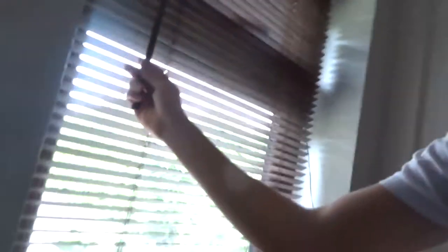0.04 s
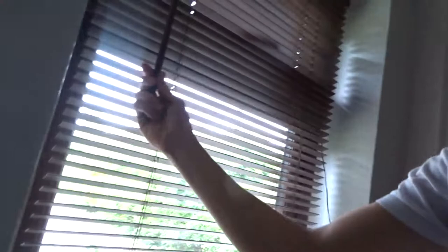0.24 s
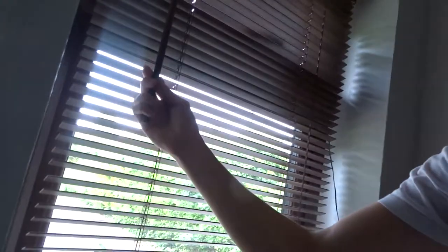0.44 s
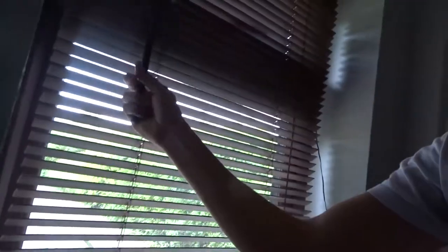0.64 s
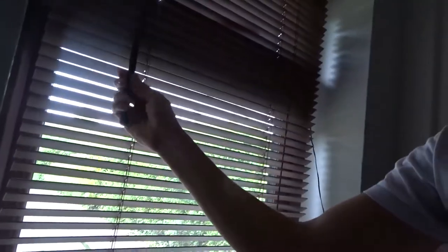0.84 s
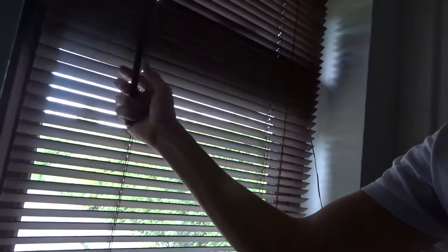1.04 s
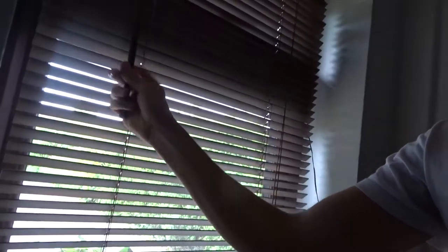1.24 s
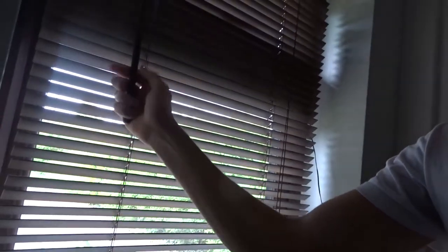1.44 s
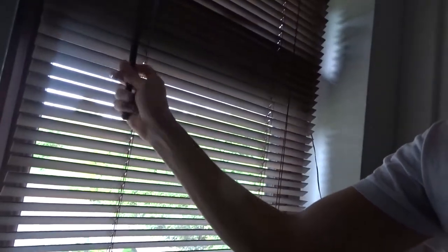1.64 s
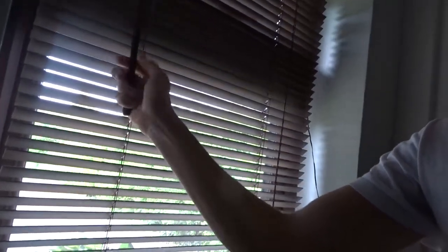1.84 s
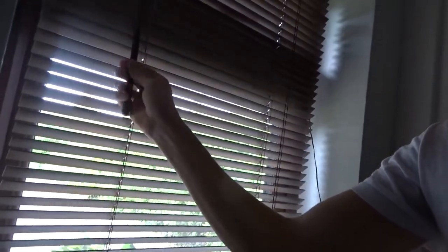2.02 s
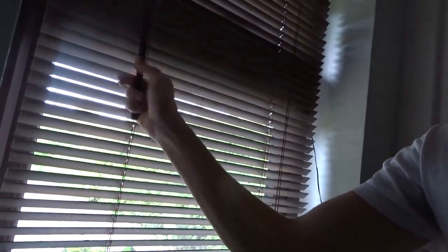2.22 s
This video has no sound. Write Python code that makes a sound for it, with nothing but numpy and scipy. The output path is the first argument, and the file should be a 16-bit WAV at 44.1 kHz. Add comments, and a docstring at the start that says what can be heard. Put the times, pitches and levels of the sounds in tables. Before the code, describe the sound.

Wooden venetian blind slats clatter in short dry bursts as a hand twists the tilt wand

```python
"""Cascades of slat knocks from a wooden venetian blind, as a hand twists its tilt wand in a quiet living room.
Each jerk of the wand tips the slats: sparse impulses, voiced by a falling resonance, ring slats and head rail.
Ticks of the gear and the wand hook are resonant clicks, each with the ring of the blind after it.
At first the blind rustles (coloured grains and hiss) and scrapes (grains in a resonance sliding down).
Steady noise is the hush of the room; two microphone ports close by and a short room tail make it stereo."""
import sys
import numpy as np
from scipy import signal
from scipy.fft import rfft, irfft, next_fast_len
from scipy.io import wavfile
from scipy.ndimage import uniform_filter1d

SR = 44100
rng = np.random.default_rng(int(sys.argv[2]) if len(sys.argv) > 2 else 0)


def file_out(sig):
    """Save sig as 16-bit WAV at sys.argv[1]."""
    # one column per channel
    cols = np.atleast_2d(sig).T
    # limit, then scale
    lim = np.clip(cols, -1, 1)
    pcm = np.round(lim * 32767).astype(np.int16)
    wavfile.write(sys.argv[1], SR, pcm)


def gain_from_db(level_db):
    """Turn a decibel level (scalar or array-like) into a linear amplitude factor."""
    decades = np.asarray(level_db, float) / 20
    return 10 ** decades


N = 100371  # length in samples
TREBLE_HZ = 4540  # where the treble of rustle and cascades is split off


def evened(x):
    """Normalisation: scales a signal to an rms of one."""
    return x / np.sqrt(np.mean(x ** 2) + 1e-20)


def read(points, hz):
    """Interpolation of a (Hz, value) table on a logarithmic frequency axis."""
    f, value = np.transpose(points)
    return np.interp(np.log(hz + 1), np.log(f + 1), value)


def add(mix, s, sound):
    """Superposition: mixes a sound in at s seconds."""
    part = mix[..., max(round(s * SR), 0):][..., :sound.shape[-1]]
    part += sound[..., :part.shape[-1]]


def coloured(x, points):
    """Minimum-phase filtering: a (Hz, dB) gain curve fixes the phase of the causal response."""
    hz = abs(np.fft.fftfreq(4096, 1 / SR))
    log_gain = np.log(gain_from_db(read(points, hz)) + 1e-6)
    response = np.exp(np.conj(signal.hilbert(log_gain)))
    taps = np.fft.ifft(response).real[:2048]
    taps = taps.reshape((1,) * (x.ndim - 1) + (-1,))
    return signal.oaconvolve(x, taps, axes=-1)[..., :x.shape[-1]]


def resonate(x, hz, width):
    """Resonance of one damped oscillator, a pair of poles; its Q is at least 0.6."""
    return signal.lfilter(*signal.iirpeak(hz, max(hz / width, .6), SR), x)


def glide(x, hz, width):
    """Resonance with a moving centre: heterodyning by the curve hz around a one-pole low-pass."""
    turn = np.exp(2j * np.pi * np.cumsum(hz) / SR)
    r = np.exp(-np.pi * width / SR)
    return 2 * (turn * signal.lfilter([1 - r], [1, -r], x / turn)).real


def decaying(count, t60s, size):
    """Frequency-dependent damping: noise tails of energy one whose bands die at their own speed."""
    hz, t, z = signal.stft(rng.standard_normal((count, size)), SR, nperseg=128)
    decay = gain_from_db(-60 * t / read(t60s, hz)[:, None])
    tail = signal.istft(z * decay, SR, nperseg=128)[1][:, :size]
    return tail / np.linalg.norm(tail, axis=1, keepdims=True)


def knocks(size, per_s):
    """Random impact process: sparse impulses of random sign, a few of them large."""
    chance, sign, big = rng.random(size), rng.standard_normal(size), rng.exponential(1, size)
    size_db = 2.5 * np.minimum(big, 3)
    return (chance < per_s / SR) * np.sign(sign) * gain_from_db(size_db)


# Course of the rustle. Each row: time in seconds, level of the body in dB, level of the treble in dB.
RUSTLE_COURSE = [(0, -43.5, -55.5), (.12, -46, -56), (.19, -48, -51.5), (0.27, -58, -60), (0.329, -67, -68)]
# Spectrum of the rustling knocks. Each row: frequency in Hz, gain in dB.
RUSTLE_SPECTRUM = [(100, -48), (380, -10.5), (560, -2.5), (3500, -0.5), (6500, -16)]
RUSTLE_PER_S = 4000  # knocks per second


def rustle():
    """Granular excitation: faint uneven knocks of the slats and a hiss of cords while the blind settles."""
    s, body_db, treble_db = np.transpose(RUSTLE_COURSE)
    t = np.arange(N) / SR
    grains = evened(coloured(knocks(N, RUSTLE_PER_S), RUSTLE_SPECTRUM))
    high_pass = signal.butter(4, TREBLE_HZ, "high", fs=SR, output="sos")
    hiss = evened(signal.sosfilt(high_pass, rng.standard_normal(N)))
    body = gain_from_db(np.interp(t, s, body_db)) * grains
    treble = gain_from_db(np.interp(t, s, treble_db)) * hiss
    return (t < s[-1]) * (body + treble)


SCRAPE_HZ, SCRAPE_WIDTH_HZ = (630, 505), 47  # resonance from first to last, and its width
SCRAPE_DB, SCRAPE_S, SCRAPE_PER_S = -52.5, 0.13, 1300  # level before the fade, length, grains per second


def scrape():
    """Resonantly filtered friction: low grains in one resonance that slides down as they fade."""
    u = np.linspace(0, 1, round(SCRAPE_S * SR))
    grains = knocks(len(u), SCRAPE_PER_S)
    low = glide(grains, np.interp(u, (0, 1), SCRAPE_HZ), SCRAPE_WIDTH_HZ)
    return gain_from_db(SCRAPE_DB) * np.sqrt(1 - u) * evened(low)


# Spectrum of the hush. Each row: frequency in Hz, gain in dB.
AIR_SPECTRUM = [(30, -71), (250, -17), (900, 3.5), (1700, 0), (6000, -6), (11500, -16)]
AIR_DB, AIR_SAME = -57.5, 0.44  # rms level, left-right correlation


def air():
    """Stationary, partly correlated noise: the steady hush of the room and the microphones."""
    a, b = rng.standard_normal((2, N))
    right = AIR_SAME * a + np.sqrt(1 - AIR_SAME ** 2) * b
    return gain_from_db(AIR_DB) * evened(coloured(np.array([a, right]), AIR_SPECTRUM))


# Spectrum of a struck slat. Each row: frequency in Hz, gain in dB.
SLAT_SPECTRUM = [(60, -73), (320, -26.5), (520, -17.5), (740, -6), (1300, -4.5), (4500, 1.5), (7500, -13),
                 (11500, -21.5)]
# Damping of the dense ring. Each row: frequency in Hz, time to fall by 60 dB in seconds.
SLAT_T60 = [(300, 0.32), (2000, 0.051), (9000, 0.036)]
# Modes shared by all slats and the rail. Each entry: frequency in Hz.
SHARED_MODES = [714.7, 781, 930, 1120.5, 1195.5, 1343, 1845, 1935, 2168, 2532]
MODES_DB, MODES_T60_S = -8, .075  # energy relative to knock and ring, time to fall by 60 dB
KNOCK_DB = -5  # dry knock relative to the ring, before colouring
EARLY_DB, EARLY_S = 4.5, 0.0026  # the ring starts strong and drops quickly to its tail


def slats(count):
    """Modal superposition: a dry knock, a dense ring for each slat and the modes they all share."""
    ring = decaying(count, SLAT_T60, size=12000)
    t = np.arange(12000) / SR
    modes = np.zeros((count, len(t)))
    for hz in SHARED_MODES:
        strength = rng.uniform(-1, 1, (count, 1)) / np.sqrt(hz)
        modes += strength * gain_from_db(-60 * t / MODES_T60_S) * np.sin(2 * np.pi * hz * t)
    modes = signal.sosfilt(signal.butter(4, 600, "high", fs=SR, output="sos"), modes)
    ring *= 1 + gain_from_db(EARLY_DB) * np.exp(-t / EARLY_S)
    ring /= np.linalg.norm(ring, axis=1, keepdims=True)
    ring[:, 0] += gain_from_db(KNOCK_DB)
    ring = coloured(ring, SLAT_SPECTRUM)
    ring /= np.linalg.norm(ring, axis=1, keepdims=True)
    return ring + gain_from_db(MODES_DB) * modes / np.linalg.norm(modes, axis=1, keepdims=True)


# Single ticks of gear and hook. Each row: start in seconds, level of the bare click in dB (rms over 1 ms),
# pitch in Hz, width of the resonance in Hz.
TICKS = [(.058, -34.5, 4470, 7300), (0.2449, -39, 3620, 604), (.355, -47.5, 3500, 4100),
         (.6855, -27, 3260, 3030), (2.019, -35.5, 2940, 3000), (2.215, -49.5, 3420, 3000),
         (2.251, -49, 3600, 1500), (.648, -38, 4200, 1480), (0.744, -37, 3720, 1540),
         (1.194, -22, 3600, 1800), (1.385, -40.5, 4050, 1210)]


def tick(ring, level_db, hz, width):
    """Impulse response: one sharp click with the blind ringing after it in the same colour."""
    impulse = np.arange(len(ring)) == 0
    click = resonate(resonate(impulse, hz, width), hz, 2 * width)
    after = ring + resonate(ring, hz, width)
    both = click / np.linalg.norm(click) + 1.32 * after / np.linalg.norm(after)
    return gain_from_db(level_db) * np.sqrt(SR / 1000) * both


# Cascades of slat knocks. Each row: start in seconds, greatest short-time rms level in dB,
# build-up in seconds (at least 0.001), dying away to -60 dB in seconds (at least 0.01),
# first pitch in Hz, gain of the treble in dB.
CASCADES = [(0.196, -47, 0.0021, 0.2, 1330, 5), (0.439, -37.5, 0.001, 0.22, 4200, 9),
            (.485, -49.5, 0.04, -4, 2300, -8), (0.532, -28, 0.0062, 0.17, 2750, 3),
            (0.603, -39, 0.011, 0.4, 2700, 0), (0.679, -28, 0.00087, 0.17, 3430, -0.5),
            (.76, -41.5, 0.001, 0.26, 2840, -3), (0.814, -34, 0.0026, 0.18, 4830, -12),
            (0.827, -36, 0.021, 0.22, 2060, -11), (0.892, -22.5, 0.0071, 0.22, 3360, 6),
            (1.0263, -21.5, 0.0022, 0.09, 3430, -3.5), (1.057, -33.5, 0.0028, 0.3, 3600, 5.5),
            (1.165, -35.5, 0.004, 0.2, 3170, -6.5), (1.196, -32.5, 0.00083, 0.14, 2220, 2.5),
            (1.24, -31, 0.00075, 0.32, 3580, 9), (1.259, -24, 0.01404, 0.2, 4600, 5),
            (1.592, -23, 0.0049, 0.1037, 3720, 2.5), (1.673, -29.5, 0.00085, 0.1362, 3600, 1.5),
            (1.944, -45.5, 0.00087, 0.1, 2030, 4.5), (2.008, -39, 0.0012, 0.1, 3180, 7.5),
            (2.05, -42, 0.012, 0.78, 1860, -3.5), (2.077, -26, 0.0026, 0.13, 3600, -1.5),
            (2.244, -47.5, 0.0044, 0.2, 1470, -4)]
KNOCKS_PER_S, THIN_S, LAST_SHARE = 3500, .015, .3  # knocks thin out to a sparser rattle
TREBLE_HASTE, BODY_HASTE = 3.64, 0.99  # speed-up of build-up and decay
KNOCK_Q, SAG_OCTAVES, SAG_S = 1.186, 1.27, 0.023  # early knocks are harder, so higher
BROAD_DB = -3  # knocks below the treble that bypass the resonance


def cascade(body, level_db, rise, fall, hz, treble_db):
    """Source and filter: knocks build up and die away, bright ones first, each exciting one of the slats."""
    t = np.arange(8000) / SR
    rise, fall = max(rise, .001), max(fall, .01)
    since_rise = np.maximum(t - rise, 0)

    def shape(haste):
        """Linear build-up and exponential decay."""
        return np.minimum(t * haste / rise, 1) * gain_from_db(-60 * haste * since_rise / fall)

    share = np.minimum(LAST_SHARE + np.exp(-since_rise / THIN_S), 1)
    hits = knocks(len(t), KNOCKS_PER_S * share)
    slat = rng.integers(0, len(body), len(t))
    on_slat = hits * (slat == np.arange(len(body))[:, None])
    bright = signal.lfilter(*signal.butter(2, TREBLE_HZ, "high", fs=SR), on_slat * shape(TREBLE_HASTE))
    slow = on_slat * shape(BODY_HASTE)
    centre = hz * 2 ** (-SAG_OCTAVES * (1 - np.exp(-t / SAG_S)))
    voiced = glide(glide(slow, centre, hz / KNOCK_Q), centre, hz / KNOCK_Q)
    broad = signal.lfilter(*signal.butter(2, TREBLE_HZ, fs=SR), slow)
    drive = voiced + gain_from_db(BROAD_DB) * broad + gain_from_db(treble_db) * bright
    sound = signal.fftconvolve(drive, body, axes=1)
    loudest = np.sqrt(uniform_filter1d(sound.sum(0) ** 2, size=600).max())
    return gain_from_db(level_db) * sound / loudest


# Likeness of the ports. Each row: frequency in Hz, left-right likeness from 0 to 1.
PORT_LIKENESS = [(600, 0.9), (3000, 0.99), (7000, 0.23)]
# Balance of the ports. Each row: frequency in Hz, left minus right in dB.
PORT_BALANCE = [(300, -1), (11000, -5)]
LEFT_LEAD_S = .000022


def ports(x):
    """Interaural-like differences: the left port is earlier and quieter, with a partly different mix of paths."""
    size = next_fast_len(N + 2000)
    hz = np.fft.rfftfreq(size, 1 / SR)
    paths = decaying(1, [(100, .07), (10000, .04)], size=3000)[0]  # (Hz, seconds to fall by 60 dB)
    other = rfft(paths, size)
    other /= np.sqrt(uniform_filter1d(abs(other) ** 2, size=size // 100))  # flat on average
    angle = np.arccos(read(PORT_LIKENESS, hz)) / 2
    lead = np.exp(2j * np.pi * hz * LEFT_LEAD_S)
    tilt = gain_from_db(read(PORT_BALANCE, hz) / 2)
    left = (np.cos(angle) + np.sin(angle) * other) * lead * tilt
    right = (np.cos(angle) - np.sin(angle) * other) / tilt
    return irfft(rfft(x, size) * np.array([left, right]), size)[:, :N]


# Damping of the room. Each row: frequency in Hz, time to fall by 60 dB in seconds.
ROOM_T60 = [(500, 0.21), (8000, 0.34)]
ROOM_DB = -12  # energy of the tail


def room(x):
    """Diffuse reverberation: a short soft tail, different at each port."""
    late = np.pad(x, (400, 0))[None]  # the tail starts 400 samples after the sound
    tails = decaying(2, ROOM_T60, size=20000)
    return gain_from_db(ROOM_DB) * signal.fftconvolve(late, tails, axes=1)[:, :N]


def scene():
    """Superposition of blind, wand and room; three parts of the blind reach the ports by their own paths."""
    blind = np.zeros((3, N))
    add(blind[0], 0, rustle())
    add(blind[1], 0, scrape())
    for s, *row in TICKS:
        add(blind[2], s, tick(slats(count=1)[0], *row))
    for s, *row in CASCADES:
        add(blind, s, cascade(slats(count=3), *row))
    return sum(ports(part) for part in blind) + room(blind.sum(0)) + air()


def roll_off(x):
    """The treble ends steeply here."""
    return signal.sosfilt(signal.butter(12, 11810, fs=SR, output="sos"), x)


def record(dry):
    """Band limitation: a linear-phase low-pass at 10930 Hz finishes the mix."""
    edge = signal.firwin(121, 10930, window=("kaiser", 7), fs=SR)
    mix = signal.oaconvolve(dry, edge[None], "same")
    return roll_off(mix)


dry = scene()
out = record(dry)
file_out(out)
```